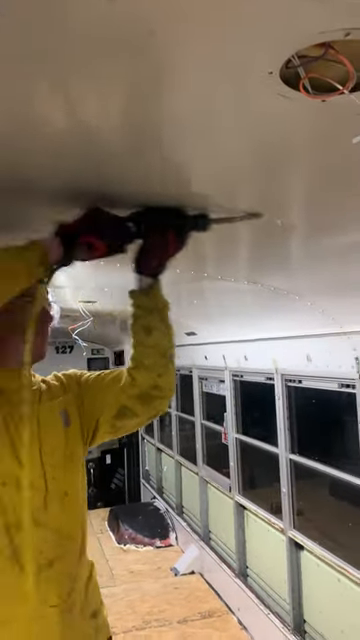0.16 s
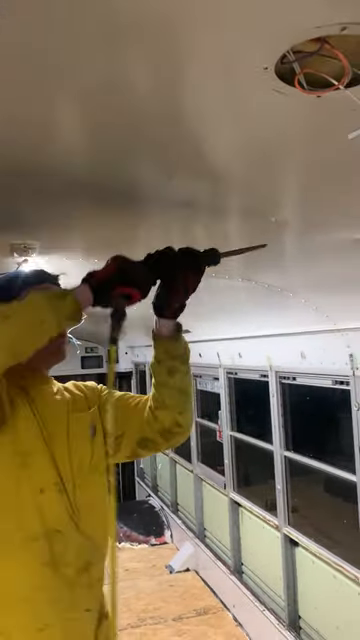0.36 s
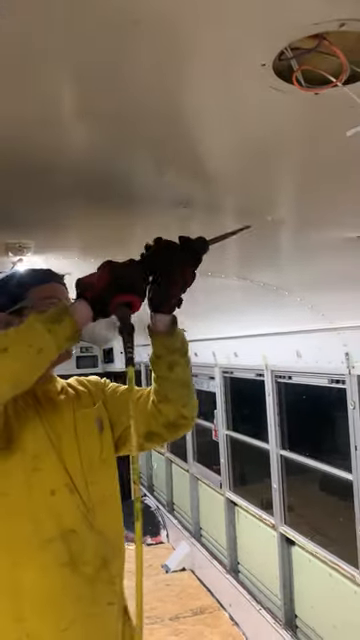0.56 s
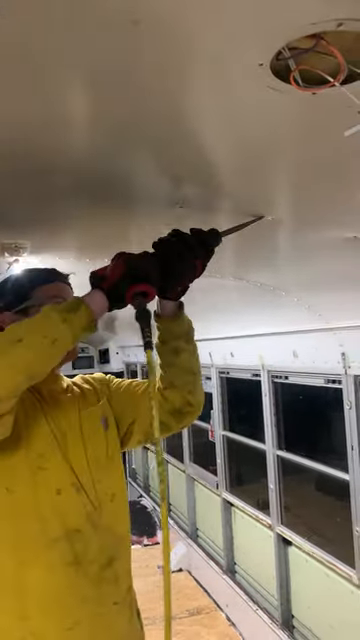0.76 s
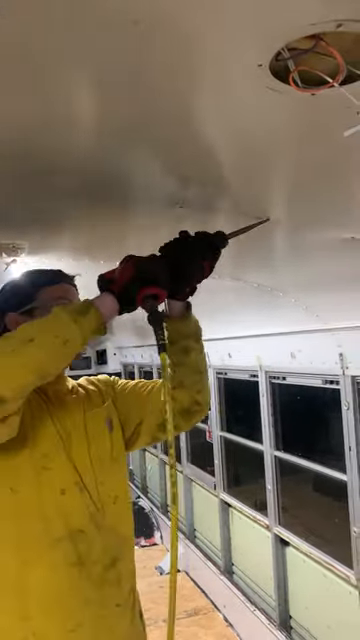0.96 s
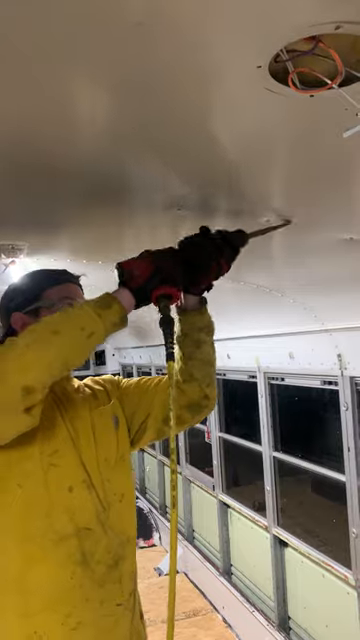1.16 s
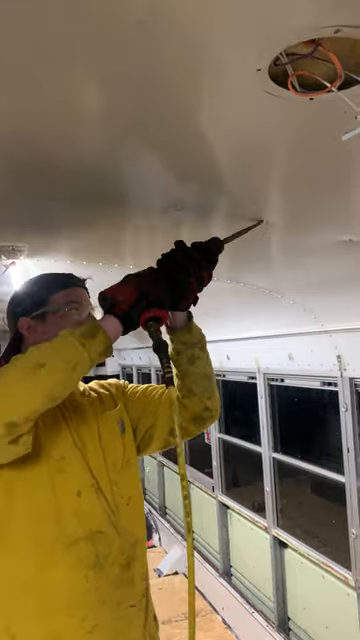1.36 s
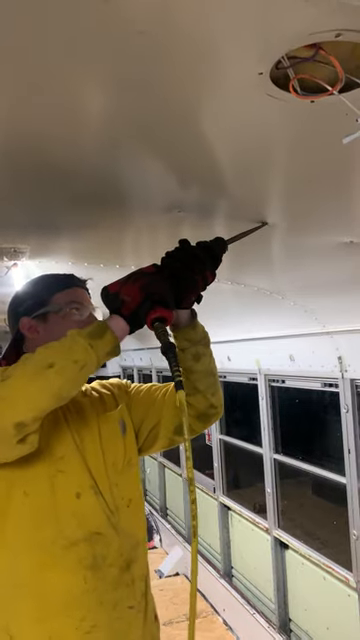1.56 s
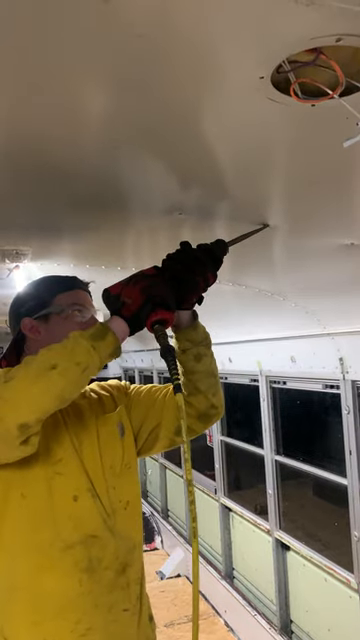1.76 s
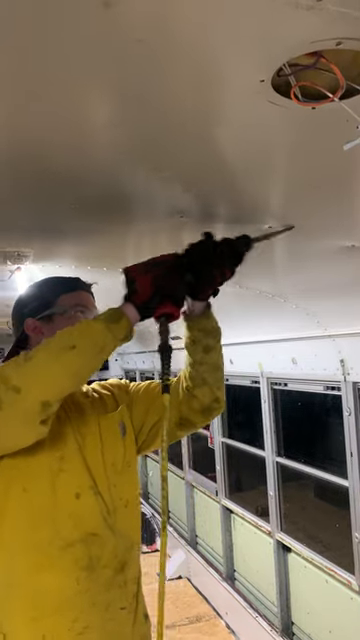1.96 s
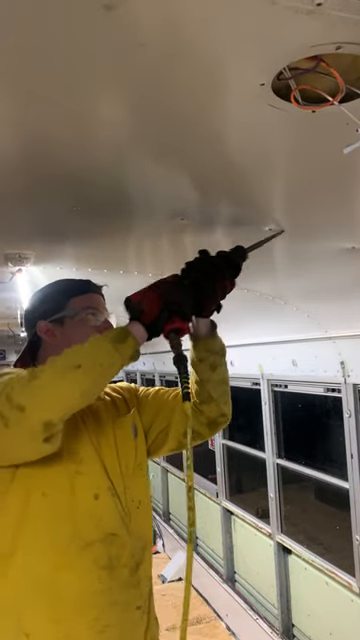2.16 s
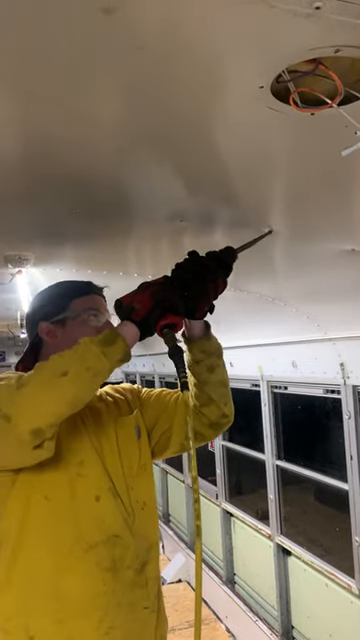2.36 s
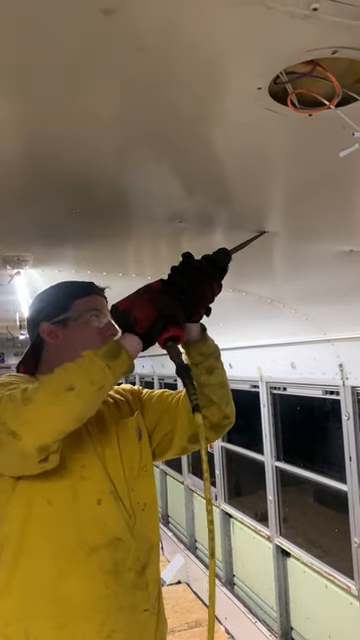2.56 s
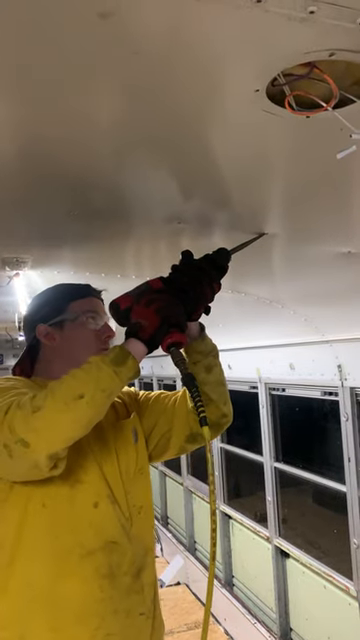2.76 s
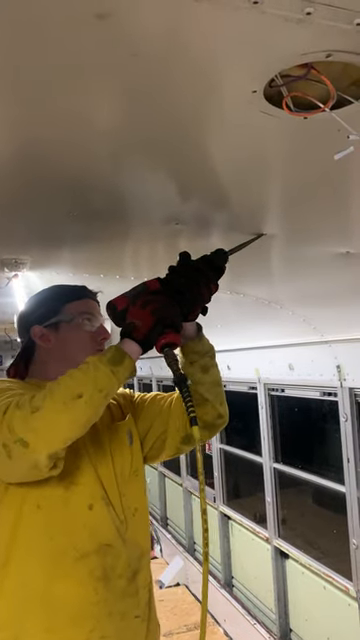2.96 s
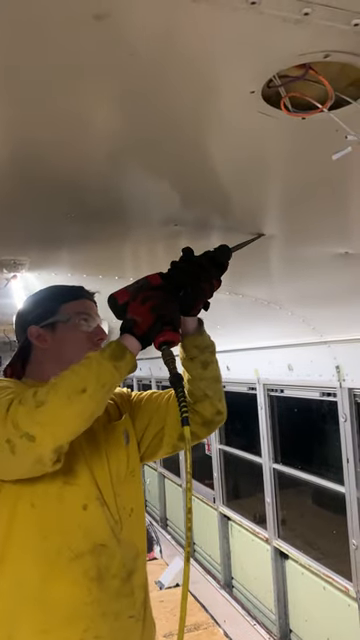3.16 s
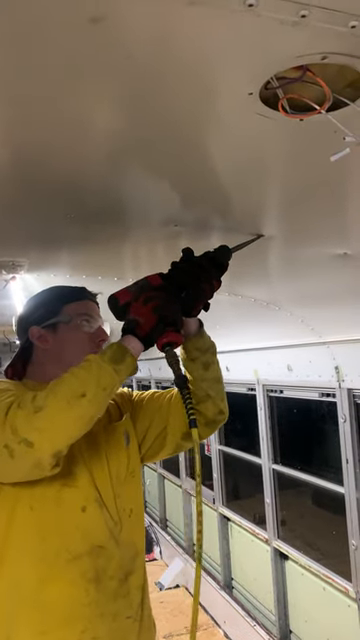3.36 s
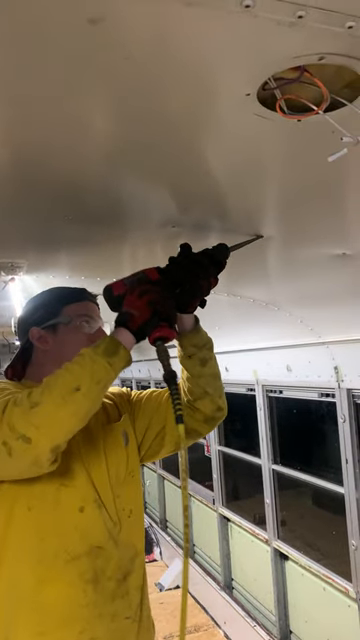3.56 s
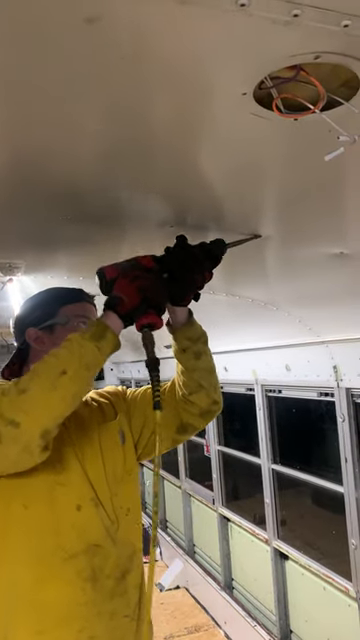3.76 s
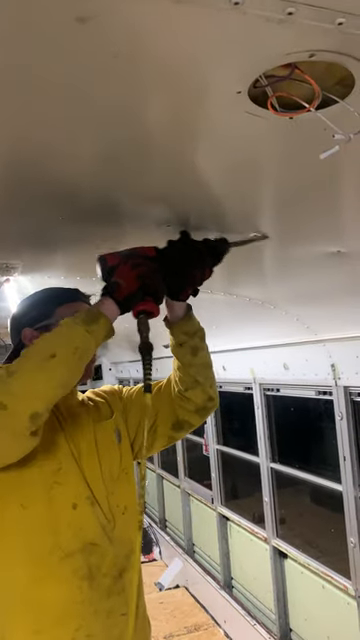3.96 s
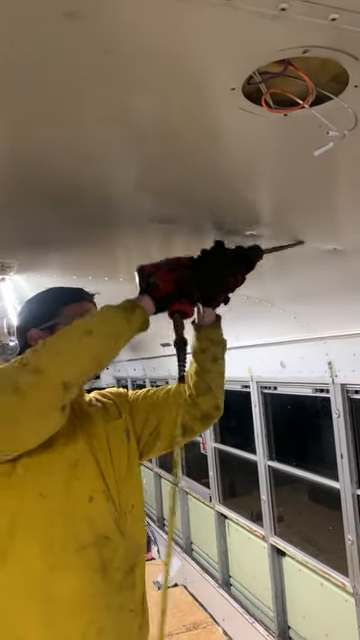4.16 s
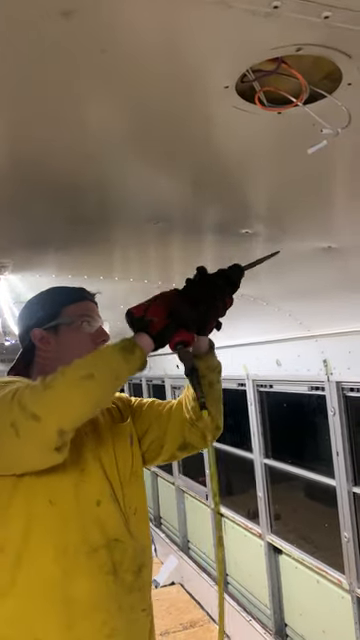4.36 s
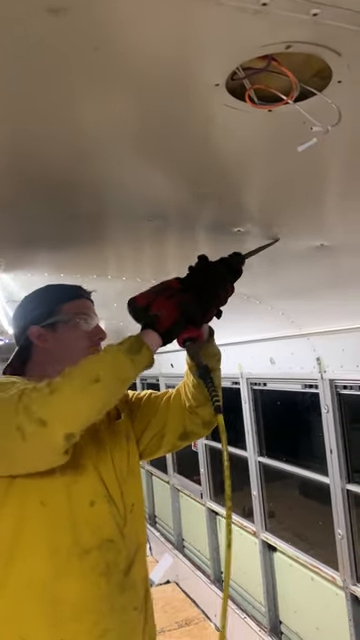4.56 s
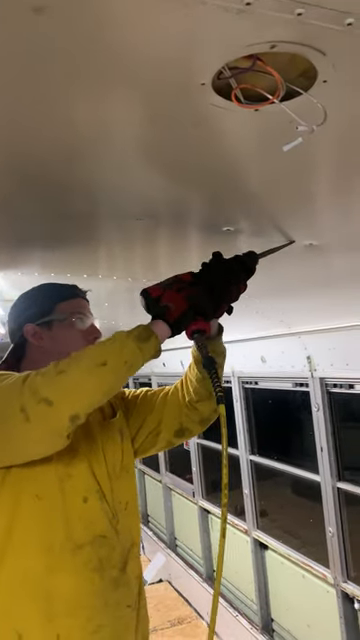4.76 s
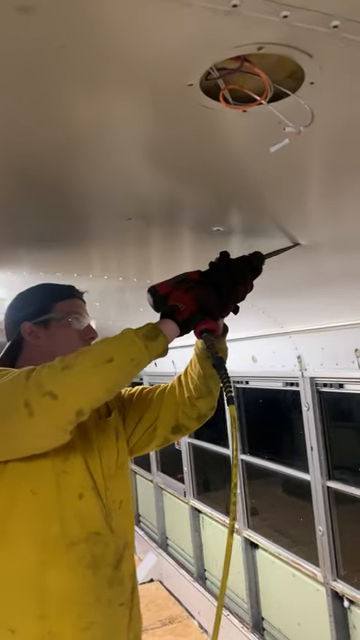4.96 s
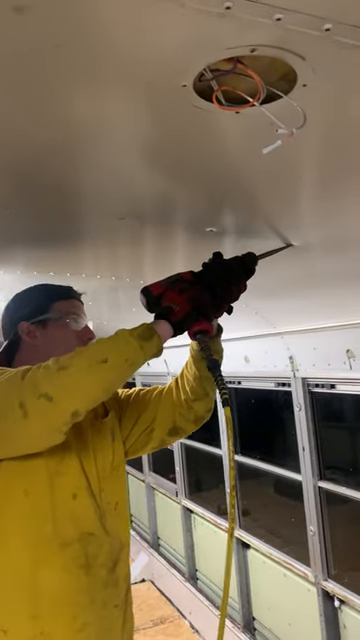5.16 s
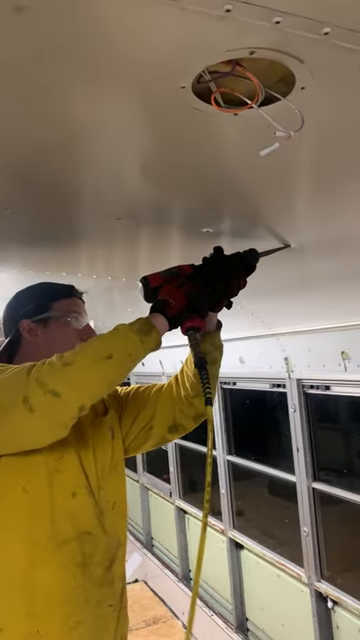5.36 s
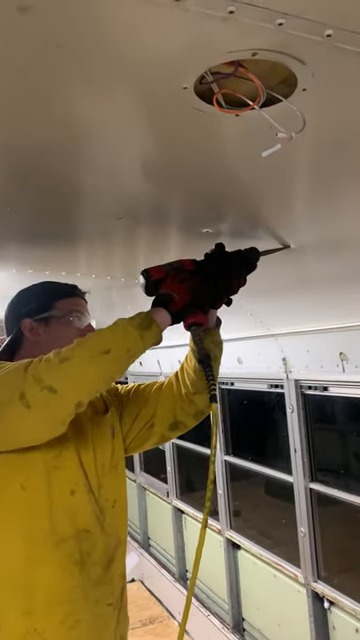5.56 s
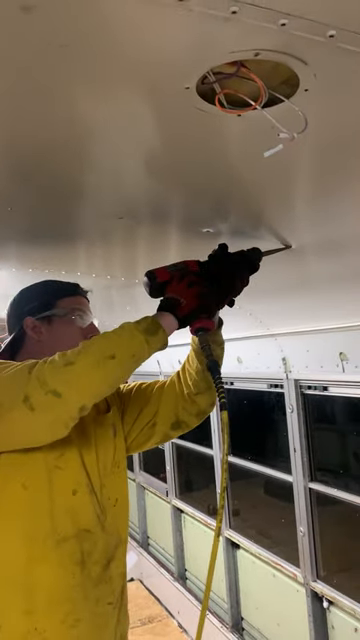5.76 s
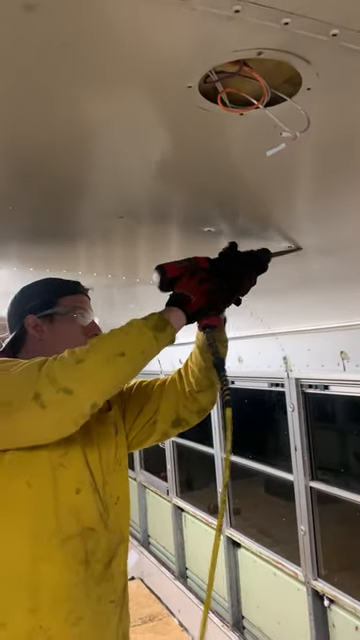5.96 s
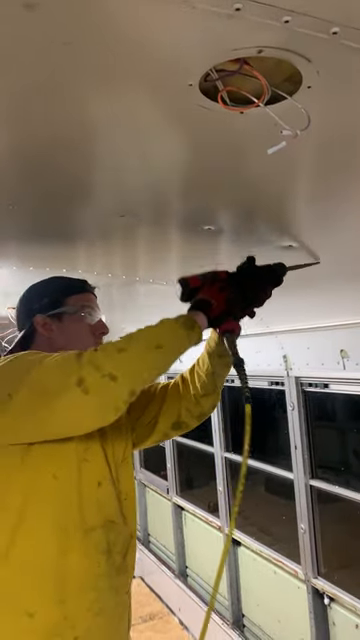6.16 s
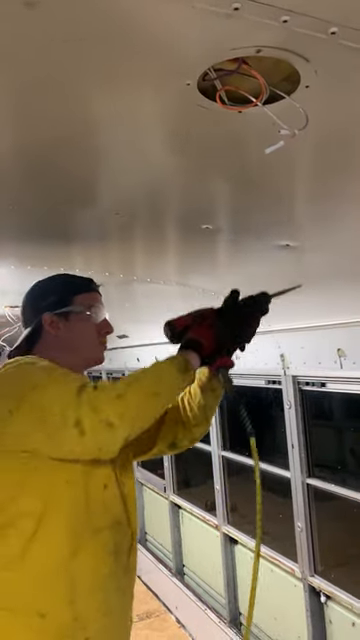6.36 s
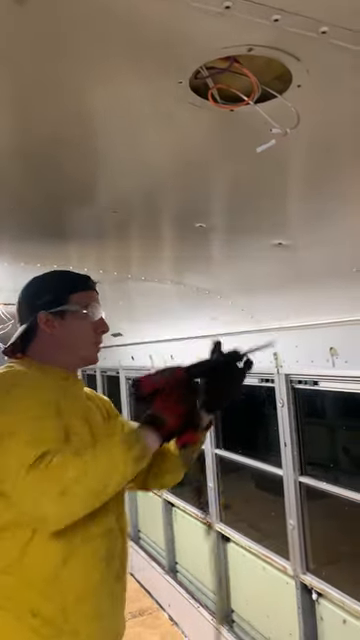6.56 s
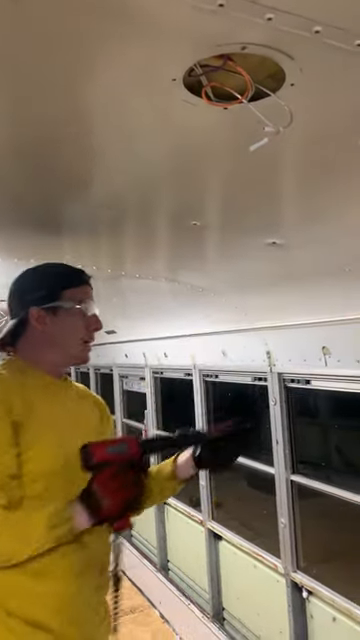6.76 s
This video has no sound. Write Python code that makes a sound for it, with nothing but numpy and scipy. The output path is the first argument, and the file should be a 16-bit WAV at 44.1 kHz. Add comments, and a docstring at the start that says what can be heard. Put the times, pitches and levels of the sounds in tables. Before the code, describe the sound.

Air chisel shearing rivets from a bare bus roof: bright machine-gun metal cracks, clanging sheet, low thumps, then scattered ticks in a ringing metal cabin.

```python
"""A short hiss, then a pneumatic hammer shears rivets from the steel ceiling of a stripped bus, about 31 blows a second.
Each blow cracks on the chisel, clatters the roof sheet and thumps its low modes; the bare cabin rings on.
The first burst ends within a third of a second, and the loose chisel ticks and knocks against the roof.
More short bursts, hisses, air puffs and ticks follow, over a faint rumble, hum and whine from start to end.
Struck sounds are mostly shaped noise and fading sine waves, heard at two close microphone ports."""
import sys
import numpy as np
from scipy import signal
from scipy.fft import rfft, irfft, next_fast_len
from scipy.io import wavfile

SR = 44100
rng = np.random.default_rng(int(sys.argv[2]) if len(sys.argv) > 2 else 0)


def store_wav(level_fs):
    """Save 16-bit WAV to argv[1]."""
    pcm = np.round(np.clip(np.atleast_2d(level_fs), -1, 1) * 32767)
    wavfile.write(sys.argv[1], SR, pcm.T.astype(np.int16))


N = 300762  # length in samples

TIME = np.arange(N) / SR  # seconds through the scene
SIZE = next_fast_len(N + SR)  # room for filter tails
HZ = np.fft.rfftfreq(SIZE, 1 / SR)
AGE = np.arange(SR * 3 // 4) / SR  # seconds since a contact

# All levels in the tables are relative; the functions set the final mix.
# Piston blows. Each row: time in seconds, then chisel crack, sheet clatter and roof thump in dB.
BLOWS = [(0.0496, -20, -26.5, -29.5), (0.082, -8, -20, -35), (0.1203, -8.5, -27.5, -17.5),
         (0.1505, -23, -32, -35.5), (0.187, -18.5, -30, -23.5), (0.2192, -18.5, -34, -27),
         (0.252, -21, -36.5, -30), (1.8574, -25, -34.5, -23.5), (1.8743, -23.5, -32.5, -27.5),
         (1.8964, -14, -26.5, -23), (1.9272, -14.5, -29, -25), (1.959, -7.5, -18, -17),
         (1.993, -7.5, -28.5, -19), (2.0304, -19.5, -36, -37.5), (2.0612, -17, -37.5, -42),
         (3.1008, -31, -39, -32), (3.1234, -26, -29, -24.5), (3.1457, -11.5, -28.0, -25),
         (3.1769, -9, -19, -14.5), (3.2104, -12, -20.5, -12), (3.248, -14, -20, -35),
         (3.4602, -11.5, -19, -17), (3.4922, -6.5, -22.5, -13.5), (3.5247, -11.5, -20.0, -23),
         (3.558, -9.5, -19.5, -20.5), (3.6081, -13.5, -24.5, -29), (3.6758, -11, -22, -29.5),
         (3.7091, -10, -19, -18.5), (3.741, -8, -19.0, -22), (3.773, -6.5, -23.5, -21.5),
         (3.8061, -7.5, -18.5, -32), (3.9221, -9.5, -20.5, -19), (3.9533, -6.5, -20, -21.5),
         (3.9864, -7.5, -23.5, -24.5), (4.0255, -13, -23.5, -30), (4.07, -16, -34.5, -45),
         (4.1504, -16, -28.5, -24), (4.1886, -16.5, -43.5, -51), (5.2603, -21.5, -37.5, -30),
         (5.279, -24.5, -32.0, -26), (5.3013, -12.5, -28.5, -22), (5.3327, -4.5, -16.0, -18.5),
         (5.3652, -8, -17, -24), (5.398, -8.5, -19, -25), (5.6632, -8.5, -21.5, -23),
         (5.695, -4, -15.5, -16), (5.7297, -7, -22, -30.5), (5.7671, -13.5, -23, -31),
         (5.8913, -7.0, -18.5, -22), (5.925, -9, -21.0, -17), (5.9587, -11, -23.5, -30),
         (5.9952, -6.5, -21.5, -31), (6.139, -14, -25, -24.5)]
# Each roof spot has its own voice. Each row: time reached in seconds, thump pitch in Hz,
# drone in dB, bark in dB, then three clang pitches in Hz.
ROOF_SPOTS = [(0, 254.4, -1.5, -12, 545, 1259, 2050), (1.7, 180, -4, -17, 540, 1066, 2310),
              (2.9, 197, -2.5, -10.5, 570, 1062, 1670), (3.65, 205.4, 0, -11.5, 621, 1558, 2474),
              (5.1, 334, -1, -8, 918, 1215, 1652)]
# Levels of those three clangs in dB, from lowest pitch to highest.
CLANG_LEVELS = [0.5, 2, -2.5]
# Broad modes of the chisel, damped by hand and retainer. Each row: pitch in Hz, width in Hz, full lift in dB.
CHISEL_MODES = [(2070, 120, 5.5), (2860, 200, 0), (4120, 660, 8), (5600, 360, -4), (6550, 1800, 4),
                (8280, 350, 5), (8770, 350, 8.5), (10950, 710, 5), (12200, 2300, 6), (13500, 1300, 5.5)]
# Upper modes of the roof sheet. Each row: pitch in Hz, level in dB, time to fall 60 dB in seconds.
PANEL_MODES = [(330, -4, 0.13), (579, -4.5, .3), (829, -3.5, 0.34), (937, -2.5, 0.26), (1076, -1.5, 0.28),
               (1318, -7, 0.18), (1389, -5.5, 0.34), (1535, -10, 0.13), (1850, -5.5, 0.51),
               (2200, -6.5, 0.4), (2764, -1.5, 0.41)]
# Low modes of the roof. Each row: pitch in Hz, level in dB, time to fall 60 dB in seconds.
ROOF_MODES = [(54.8, -30.5, 0.93), (95.4, -12.5, 0.5), (122.7, -12.5, 0.29), (186.1, -9, 0.27),
              (218.1, -8.5, 0.27), (253, -19.5, 0.34), (305, -13.5, 0.32)]
# A rivet gives way and the roof sheet springs back. Each row: time in seconds, level in dB.
SHEARS = [(0.151, -44), (2, -37), (4.029, -32.5)]
# The loose chisel clicks on steel. Each row: time in seconds, click in dB, ring in dB.
TICKS = [(0.26, -13.5, -56), (0.3158, -31.5, -69), (0.3612, -12.5, -47.5), (0.5262, -33.5, -82),
         (0.5641, -38, -63.5), (0.6913, -24, -46), (1.022, -69, -82), (1.3518, -45.5, -57),
         (1.3718, -51, -54), (1.4042, -38, -63.5), (2.128, -35, -66), (2.152, -26, -54),
         (3.876, -20, -50.5), (4.129, -27, -57.5), (4.253, -16, -38.5), (4.5386, -39.5, -63.5),
         (4.6788, -31.5, -45), (4.845, -26, -50.5), (5.0043, -43.5, -59), (5.1165, -50, -59.5),
         (5.1721, -36, -61), (6.078, -22.5, -55.5), (6.1972, -18.5, -50), (6.4468, -14, -43)]
# The chisel jiggles in its retainer, ever harder as it nears the roof.
# Each row: start in seconds, end in seconds, then the hardest click and ring in dB.
JIGGLES = [(0.94, 1.141, -52, -59.5), (5.021, 5.157, -57, -76)]
# Ring of the unloaded chisel. Each row: pitch in Hz, level in dB, time to fall 60 dB in seconds.
SHANK_MODES = [(1965, -8, .43), (3080, -9.5, .39), (3340, -8, .33), (4194, -12.5, .24), (4550, -7, .32),
               (5300, -4.5, .3), (6770, -10.5, 0.19), (7830, -5.5, 0.15), (11260, -21, 0.11)]
# Dull knocks of the tool being set against the roof.
# Each row: time in seconds, bark in dB, boom and thud in dB, thud pitch in Hz, clang pitch in Hz.
KNOCKS = [(0.769, -45.5, -51, 299, 740), (0.947, -51.5, -51.5, 110, 700), (1.127, -51.5, -46.5, 327, 604),
          (1.405, -42, -48.5, 102, 719), (1.599, -44, -43.5, 190, 1242), (2.713, -50.5, -53.5, 156, 1227),
          (4.541, -43.5, -46.5, 188, 856), (4.964, -37, -46.5, 261, 1333)]
# Faint hisses leading into a burst, and louder air puffs at 3.435 and 5.617 s.
# Each row: start in seconds, end in seconds, level in dB.
HISSES = [(0.039, 0.05, -46.5), (1.843, 1.866, -59.5), (3.085, 3.114, -59), (3.435, 3.46, -37.5),
          (5.246, 5.266, -56.5), (5.617, 5.664, -38.5)]

# Tone colours of noise. Each row: frequency in Hz, relative level in dB per Hz.
CRACK_COLOUR = [(1000, -23.5), (2500, -17.5), (4000, -7), (5200, -2.5), (6500, -2), (8000, -1),
                (10500, -5.5), (13000, -3), (16000, -3)]  # chisel cracks and hisses
SHEET_COLOUR = [(30, -22.5), (70, -4.5), (120, 5.5), (200, 3), (340, 3.5), (470, 1), (600, 1.5), (780, 0),
                (1100, -2), (1600, -4.5), (2500, -7), (3200, -7.5), (5000, -28), (10000, -26.5)]  # sheet clatter
BARK_COLOUR = [(500, -33), (1000, -2.5), (1300, -3), (1700, -7.5), (2200, -8.5), (3500, -30)]  # barks of the sheet under the blows
CLICK_COLOUR = [(300, -18.5), (1000, -11), (3200, -15), (6700, -2.5), (10000, -6.5), (13000, -12.5),
                (16000, -16.5)]  # light clicks
SNAP_COLOUR = [(6000, -28.5), (10500, -2), (14000, 0), (16000, -10)]  # the top end of harder clicks
RING_COLOUR = [(100, -13), (600, -4), (1000, -7.5), (2000, 0.5), (3200, 4.5), (4200, 3), (5200, -1),
               (8000, -12), (13000, -43.5), (16000, -47.5)]  # thin ring after a tick
KNOCK_COLOUR = [(150, -8), (400, -6), (1000, -0.5), (1550, -3.5), (1850, -13), (4000, -23), (8000, -32.5),
                (15000, -44.5)]  # barks of the dull knocks
BOOM_COLOUR = [(25, -20), (55, 3.5), (100, 2), (180, -0.5), (300, -5.5), (600, -7), (1000, -24.5),
               (2000, -49)]  # booms of the dull knocks
RUMBLE_COLOUR = [(25, -13.5), (55, -4), (100, -3.5), (200, -17.5), (500, -33), (1200, -22), (1800, -31.5),
                 (4000, -39.5), (15000, -61.5)]  # background rumble
WHINE_COLOUR = [(1200, -48), (1370, -17), (1410, 3), (1450, -14.5), (1650, -51.5)]  # background whine

# Ring of the bare cabin. Each row: frequency in Hz, time to fall 60 dB in seconds.
CABIN_DECAY = [(60, 0.92), (160, 0.45), (420, 0.52), (1100, 0.53), (3000, 0.55), (7700, 0.38),
               (13000, 0.25), (16000, 0.19)]
# Phase between the ports. Each row: frequency in Hz, radians by which right leads.
PORT_PHASE = [(100, .2), (300, 0), (700, -1.2), (1200, -.2), (1700, -1.1), (2300, -3.2), (5300, -3.3),
              (6500, -6), (7300, -6.4), (8300, -7.8), (9800, -9.5), (12500, -12.6), (15000, -15.7),
              (16000, -16.5)]
# How alike the ports are. Each row: frequency in Hz, likeness from 0 to 1.
PORT_ALIKE = [(40, .4), (100, .65), (300, .68), (550, .25), (1200, .42), (2100, .25), (3000, .88),
              (3800, .2), (5000, .92), (6000, .3), (6800, .9), (8300, .85), (9800, .98), (11000, .8),
              (15000, .95)]
# Balance of the ports. Each row: frequency in Hz, left minus right in dB.
PORT_BALANCE = [(90, -.5), (130, -.5), (190, -4.5), (330, -3), (500, -.3), (2000, 0)]
# Overall tone: a narrow peak near 15650 Hz, then a steep cut. Each row: frequency in Hz, gain in dB.
OVERALL_TONE = [(15, -24), (30, -14.5), (48, 2.5), (14700, 1), (15300, 7.5), (15650, 17.5), (15950, -15),
                (16300, -30)]

LEAD_S, LEAD_DB = 0.002, -18.5  # a faint soft onset just before each crack
REBOUND_S, REBOUND_DB = 0.0066, -7  # typical: the bit bounces back against its retainer
# stray contact after a blow: longest delay, level, and how fast it weakens with delay
SETTLE_S, SETTLE_DB, SETTLE_DB_PER_S = 0.31, -12.5, -105
JIGGLE_SWELL_DB = 25.5  # rise across a whole jiggle
SNAP_GROWS = 1.9  # dB of top-end snap for each dB of click
SHIFT_HZ = 0.9  # how fast the cabin's echo pattern turns as tool and arms move
HUM_HZ = 91.5
CEILING = .85  # sample level that the rounded peaks approach
TOP_HZ = 16600  # nothing is kept from here up


def chisel():
    """The piston hits the shank: a faint soft onset, a hard crack, then a weaker one as the bit rebounds in its retainer."""
    envelope = swell(0.0017) * (fade(0.032) + amp(-18) * fade(0.07))
    hits = [(s, db) for s, db, _, _ in BLOWS]
    onsets = [(s - LEAD_S, db + LEAD_DB) for s, db in hits]
    rebounds = []
    for s, db in hits:
        delay = REBOUND_S * amp(rng.normal(0, 2.8))
        rebounds.append((s + delay, db + REBOUND_DB + rng.normal(0, 2.8)))
    rows = onsets + hits + rebounds + settling(hits)
    cracks = strikes(rows, envelope, rattle_db=4.0, crackle_db=22.5, size=SR // 10)
    voiced = bit(colour(cracks, CRACK_COLOUR), depth=0.61)
    return amp(-5.5) * cabin(voiced, wet_db=-3)


def settling(hits):
    """The loose bit makes one faint stray contact after each (s, dB) blow, weaker the later it comes."""
    delays = SETTLE_S * rng.random(len(hits))
    return [(s + delay, db + SETTLE_DB + SETTLE_DB_PER_S * delay) for (s, db), delay in zip(hits, delays)]


def sheet():
    """Each blow passes into the roof sheet, whose crowded modes clatter; each spot has its own bark and clangs."""
    rows = [(s, db) for s, _, db, _ in BLOWS]
    clatter_envelope = swell(0.0012) * (fade(0.049) + amp(-17.0) * fade(.2))
    clatter = strikes(rows, clatter_envelope, rattle_db=3.0)
    bark_rows = [(s, db + spot(s)[3]) for s, db in rows]
    barks = strikes(bark_rows, swell(0.0014) * fade(0.11), rattle_db=-0.5)
    voices = []
    for s, db in rows:
        voices += [(s, db + clang_db, hz) for hz, clang_db in zip(spot(s)[4:], CLANG_LEVELS)]
    clang = clangs(voices, swell(0.002) * fade(0.098), width_hz=70, size=SR // 7)
    body = colour(clatter, SHEET_COLOUR) + colour(barks, BARK_COLOUR) + amp(-14) * clang
    return amp(-0.5) * cabin(body, wet_db=2.0) + amp(-16) * panel(rows, scatter_db=4.5)


def spot(s):
    """The row of the roof spot that is being cut at time s."""
    return ROOF_SPOTS[sum(s > row[0] for row in ROOF_SPOTS[1:])]


def clangs(rows, envelope, width_hz, size=SR // 3):
    """A tight cluster of sheet modes, made of narrow-band noise, rings at each (s, dB, pitch Hz)."""
    track = np.zeros((2, N))
    for s, db, hz in rows:
        b, a = signal.iirpeak(hz, hz / width_hz, SR)
        ring = signal.lfilter(b, a, noise(size))
        add(track, s, amp(db) * envelope[:size] * ring / ring.std())
    return track


def panel(rows, scatter_db):
    """Each (s, dB) blow picks out a different mix of the sheet's upper modes, detuned by the push of the chisel."""
    track, t = np.zeros((2, N)), AGE[:SR // 4]
    hz, mode_db, t60 = np.transpose(PANEL_MODES)[:, :, None]
    decay = amp(mode_db) * fade(t60, t) * swell(0.0019)[:len(t)]
    for s, db in rows:
        detune = 1 + rng.normal(0, .006, hz.shape)
        levels = amp(scatter_db * rng.standard_normal((2, len(hz))))
        mix = levels * rng.choice([-1, 1], (2, len(hz)))
        add(track, s, amp(db) * mix @ (decay * np.sin(2 * np.pi * hz * detune * t)))
    return track


def roof():
    """Every blow thumps the roof and sets its low modes ringing; overlapping rings build a drone."""
    thumps, drone = np.zeros((2, N)), np.zeros((2, N))
    modes = np.array([amp(db) * fade(t60) * np.sin(2 * np.pi * hz * AGE) for hz, db, t60 in ROOF_MODES])
    for s, _, _, db in BLOWS:
        _, thump_hz, drone_db, *_ = spot(s)
        scatter_db = rng.normal(0, 2.5, len(ROOF_MODES))
        low_hz = thump_hz * (1 + rng.normal(0, .06))
        thump = bending_wave(high_hz=701.5, low_hz=low_hz, sweep=0.002, crest=0.0054)
        add(thumps[0], s, amp(db) * thump)
        add(drone[0], s, amp(db + drone_db + scatter_db) @ modes * swell(0.0031))
    return amp(-4.5) * cabin(thumps, wet_db=-2.5) + drone


def bending_wave(high_hz, low_hz, sweep, crest):
    """Treble travels faster through sheet metal, so a blow is a short falling chirp that peaks after crest seconds."""
    hz = low_hz + (high_hz - low_hz) * np.exp(-AGE / sweep)
    bulge = (AGE / crest * np.exp(1 - AGE / crest)) ** 2
    return np.sin(2 * np.pi * np.cumsum(hz) / SR) * bulge


def spring_back():
    """The freed sheet wobbles on in its lowest mode."""
    track, (hz, _, t60) = np.zeros((2, N)), ROOF_MODES[0]
    wobble = swell(0.026) * fade(t60) * np.sin(2 * np.pi * hz * AGE)
    for s, db in SHEARS:
        add(track[0], s, amp(db) * wobble)
    return track


def ticks():
    """Light steel contacts: a very short click, brighter when harder, then the thin ring of loose chisel and roof."""
    rows = TICKS + jiggles(count=7)
    click_rows = [(s, db) for s, db, _ in rows]
    snap_rows = [(s, SNAP_GROWS * db) for s, db, _ in rows]
    ring_rows = [(s, db) for s, _, db in rows]
    envelope = swell(0.0031) * fade(0.018)
    clicks = strikes(click_rows, envelope, rattle_db=-0.5, crackle_db=19.5, size=SR // 25)
    snaps = strikes(snap_rows, envelope, rattle_db=6.0, crackle_db=20.5, size=SR // 25)
    rings = strikes(ring_rows, swell(0.0018) * fade(0.45), rattle_db=1.0, size=SR // 2)
    dry_contact = amp(-5.5) * colour(clicks, CLICK_COLOUR) + amp(3.0) * colour(snaps, SNAP_COLOUR)
    contact = bit(cabin(dry_contact, wet_db=-6.0), depth=0.69)
    return contact + amp(2.5) * colour(rings, RING_COLOUR) + shank(TICKS)


def jiggles(count):
    """Faint, unevenly spaced contacts that grow stronger, as (s, click dB, ring dB)."""
    rows = []
    for start, end, click_db, ring_db in JIGGLES:
        progress = (np.arange(count) + rng.random(count)) / count
        force_db = JIGGLE_SWELL_DB * (progress - 1)
        rows += zip(start + (end - start) * progress, click_db + force_db, ring_db + force_db)
    return rows


def shank(rows):
    """The unloaded chisel rings in its own modes, detuned a little by the grip."""
    track = np.zeros((2, N))
    for s, _, db in rows:
        for hz, mode_db, t60 in SHANK_MODES:
            detune, scatter_db = rng.normal(0, [.006, 3])
            tone = np.sin(2 * np.pi * hz * (1 + detune) * AGE)
            add(track[0], s, amp(db + mode_db + scatter_db) * swell(0.001) * fade(t60) * tone)
    return track


def knocks():
    """Soft contacts make the sheet bark and the roof boom, with a thud and hollow clang pitched by the spot."""
    barks = strikes([(s, db) for s, db, *_ in KNOCKS], swell(0.0017) * fade(0.21))
    booms = strikes([(s, db) for s, _, db, *_ in KNOCKS], swell(0.0012) * fade(0.25))
    clang_rows = [(s, db, hz) for s, db, _, _, hz in KNOCKS]
    clang = clangs(clang_rows, swell(0.002) * fade(0.43), width_hz=90)
    thuds = np.zeros((2, N))
    for s, _, db, hz, _ in KNOCKS:
        add(thuds[0], s, amp(db) * bending_wave(high_hz=725.0, low_hz=hz, sweep=0.0042, crest=0.0089))
    dull = amp(-9) * colour(barks, KNOCK_COLOUR) + amp(-3) * colour(booms, BOOM_COLOUR)
    return cabin(dull + amp(-4.5) * thuds + amp(-18) * clang, wet_db=-3.0)


def hisses():
    """Short stretches of coloured noise: faint hiss leading into a burst, and two louder puffs of air."""
    flow = np.zeros(N)
    for start, end, db in HISSES:
        corners = [start - .003, start + 0.0034, end, end + .008]
        flow += amp(db) * np.interp(TIME, corners, [0, 1, 1, 0])
    return cabin(colour(flow * noise(N), CRACK_COLOUR), wet_db=0.0)


def background():
    """A faint workshop rumble with a low hum and a thin, airy whine."""
    rumble = amp(-73.5) * colour(noise(N), RUMBLE_COLOUR)
    rumble[0] += amp(-71.5) * np.sin(2 * np.pi * HUM_HZ * TIME)
    return rumble + amp(-81.5) * colour(noise(N), WHINE_COLOUR)


def strikes(rows, envelope, rattle_db=0, crackle_db=0, size=SR // 4):
    """Dense steel modes struck at (s, dB) are fresh noise, chattering as contact bounces and crackling as it bites."""
    track, t = np.zeros((2, N)), AGE[:size]
    for s, db in rows:
        knots = t[::40]  # the bounce takes a new random value every 40 samples
        bounce = np.interp(t, knots, rng.standard_normal(len(knots)))
        chatter = amp(rattle_db * bounce + crackle_db * rng.uniform(-0.71, 1, size))
        chatter /= np.sqrt(np.mean(chatter ** 2))
        add(track, s, amp(db) * envelope[:size] * noise(size) * chatter)
    return track


def bit(x, depth):
    """The chisel's broad modes resonate, lifting their bands out of a contact."""
    lift = 1
    for hz, width, db in CHISEL_MODES:
        damping = 1j * HZ * width
        lift = lift + depth * (amp(db) - 1) * damping / (hz * hz - HZ * HZ + damping)
    return irfft(rfft(x, SIZE) * lift, SIZE)[..., :N]


def cabin(x, wet_db):
    """The sound plus the bare cabin's ring: noise tails fading at their own rate per band, in a slowly shifting mix."""
    hz, t, z = signal.stft(np.array([noise(), noise()]), SR, nperseg=256)
    decay = fade(along(CABIN_DECAY, hz)[:, None], t)
    tails = signal.istft(z * decay, SR, nperseg=256)[1][..., :len(AGE)] * swell(0.00087)
    tails /= np.linalg.norm(tails, axis=-1, keepdims=True)
    turn = 2 * np.pi * SHIFT_HZ * TIME
    echo = 0
    for share, tail in zip([np.cos(turn), np.sin(turn)], tails):
        echo = echo + rfft(np.float32(x * share), SIZE) * rfft(np.float32(tail), SIZE)
    return x + amp(wet_db) * irfft(echo, SIZE)[:, :N]


def ports(pair):
    """Shared and unshared sound reach left and right with a phase that turns with frequency."""
    turn = np.arccos(np.clip(along(PORT_ALIKE), 0, 1)) / 2
    shared, unshared = rfft(pair, SIZE) * [np.cos(turn), np.sin(turn)]
    lean = amp(along(PORT_BALANCE) / 2) * np.exp(-.5j * along(PORT_PHASE))
    left, right = (shared + unshared) * lean, (shared - unshared) / lean
    return irfft(np.array([left, right]), SIZE)[:, :N]


def amp(db):
    """Decibels to gain."""
    return 10 ** (np.asarray(db) / 20)


def along(points, hz=HZ):
    """(Hz, value) points joined on a log frequency axis."""
    f, v = np.transpose(points)
    return np.interp(np.log(hz + 1), np.log(f + 1), v)


def fade(t60, t=AGE):
    """An exponential decay that falls 60 dB in t60 seconds."""
    return np.exp(-np.log(1000) * t / t60)


def swell(rise):
    """A soft start with a time constant of rise seconds."""
    return 1 - np.exp(-AGE / rise)


def noise(size=len(AGE)):
    """Two rows of noise: in a source, the part that both ports share and the part that they do not."""
    return rng.standard_normal((2, size))


def add(track, s, sound):
    """Mix a sound into a track from time s."""
    part = track[..., round(s * SR):][..., :sound.shape[-1]]
    part += sound[..., :part.shape[-1]]


def colour(x, spectrum):
    """A causal (minimum-phase) filter that keeps the power of white noise."""
    gain = amp(along(spectrum))
    cepstrum = irfft(np.log(gain / np.sqrt(np.mean(gain ** 2))), SIZE)
    # folding the cepstrum forward in time makes the filter causal
    cepstrum[1:SIZE // 2] *= 2
    cepstrum[SIZE // 2 + 1:] = 0
    return irfft(rfft(x, SIZE) * np.exp(rfft(cepstrum)), SIZE)[..., :N]


def scene():
    """Everything in the bus, at the two ports."""
    hammering = chisel() + sheet() + roof() + spring_back()
    return ports(hammering + ticks() + knocks() + hisses() + background())


def record(dry):
    """Shape the overall tone, with a narrow peak before a steep cut, and round off the highest peaks."""
    x = irfft(rfft(dry, SIZE) * amp(along(OVERALL_TONE)), SIZE)[:, :N]
    x = x / (1 + (x / CEILING) ** 6) ** (1 / 6)
    return irfft(rfft(x, SIZE) * (HZ < TOP_HZ), SIZE)[:, :N]


dry = scene()
out = record(dry)
store_wav(out)
```